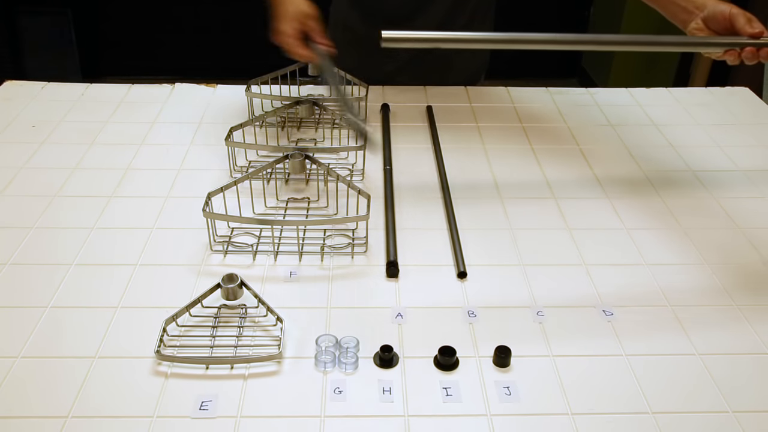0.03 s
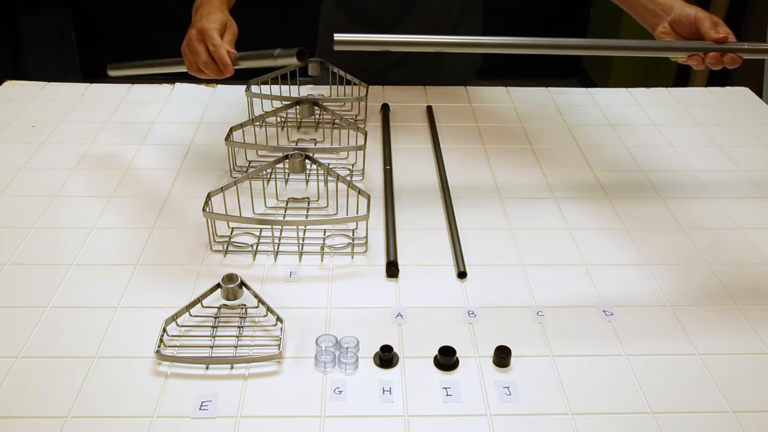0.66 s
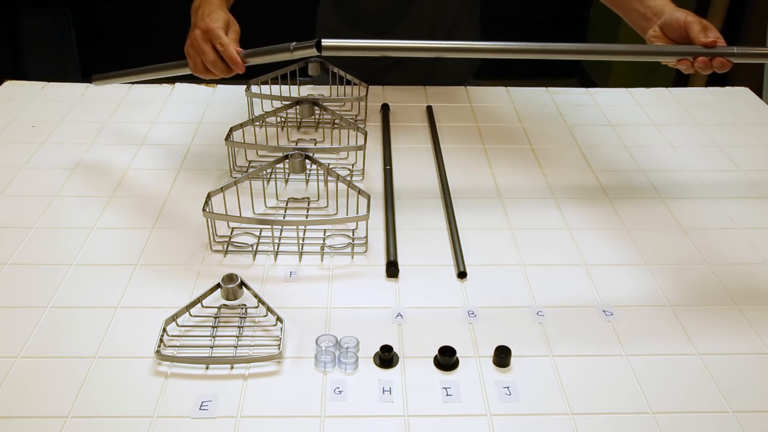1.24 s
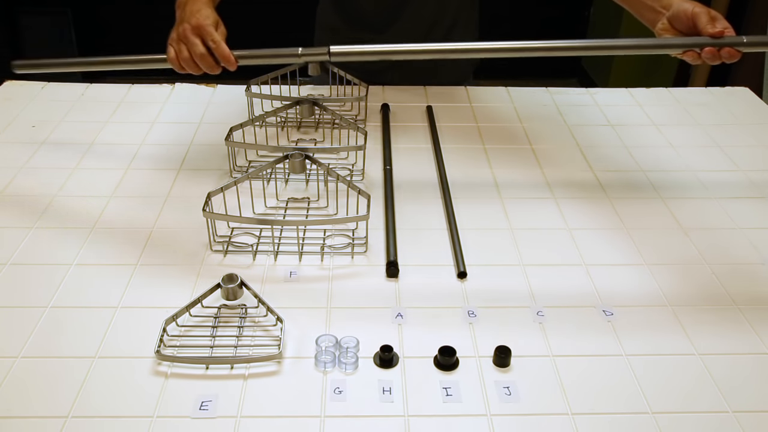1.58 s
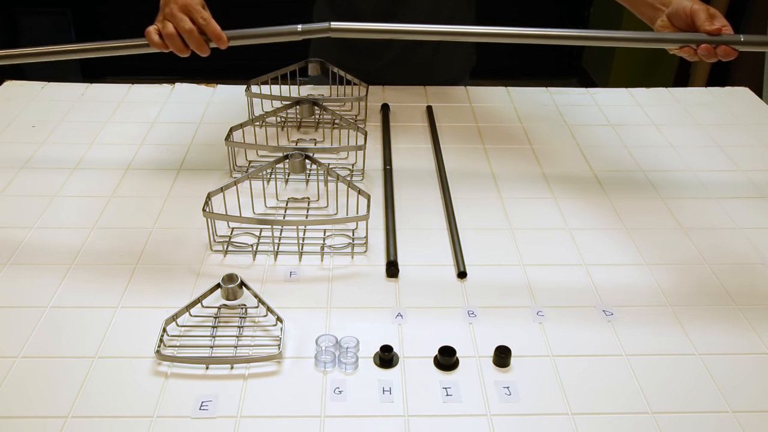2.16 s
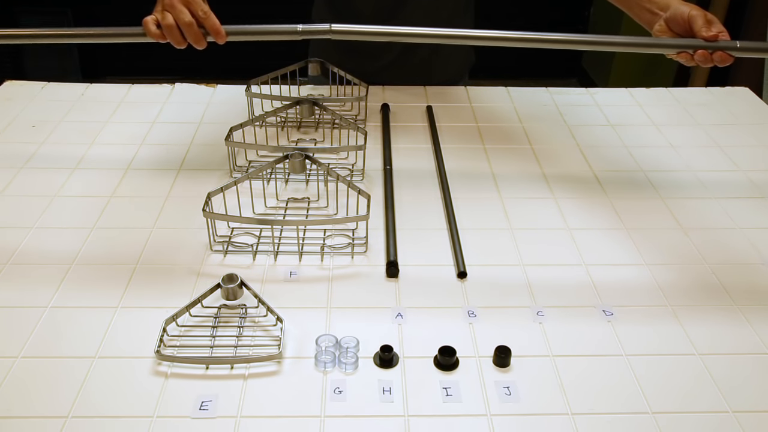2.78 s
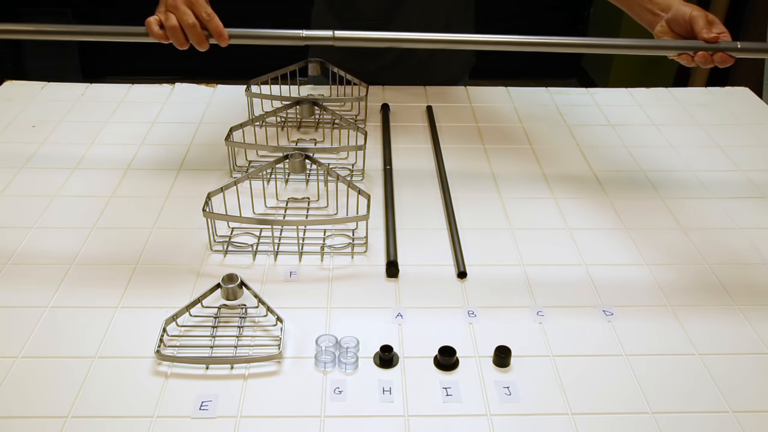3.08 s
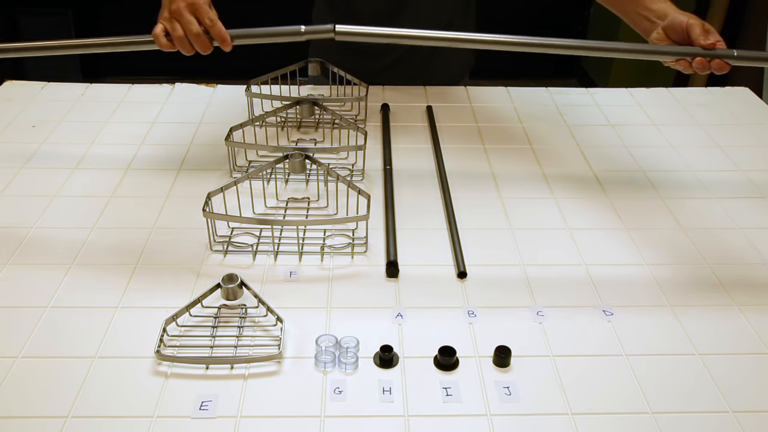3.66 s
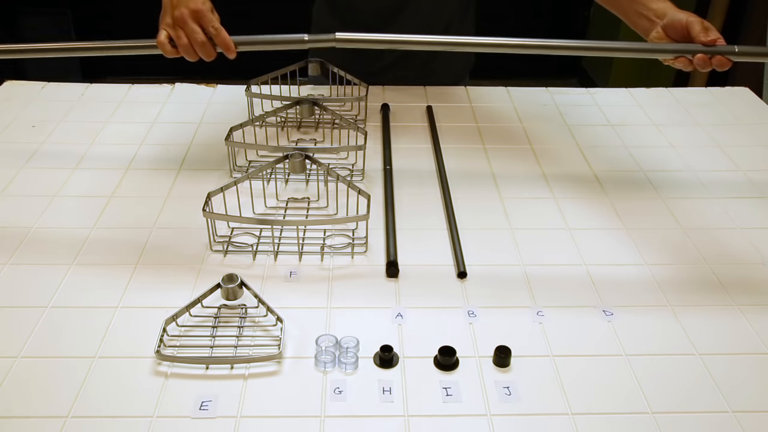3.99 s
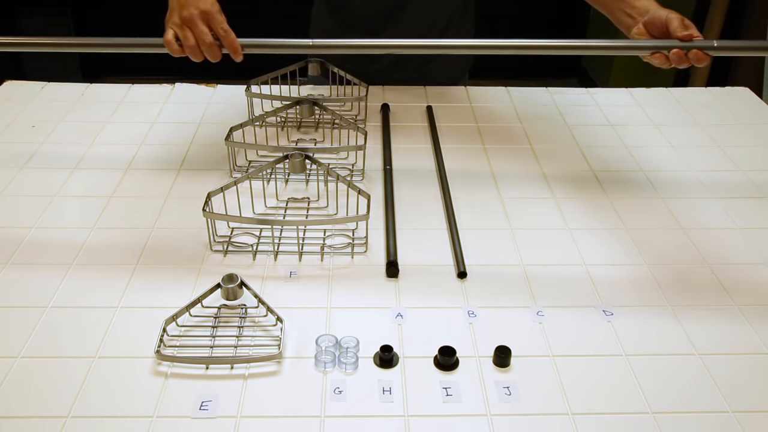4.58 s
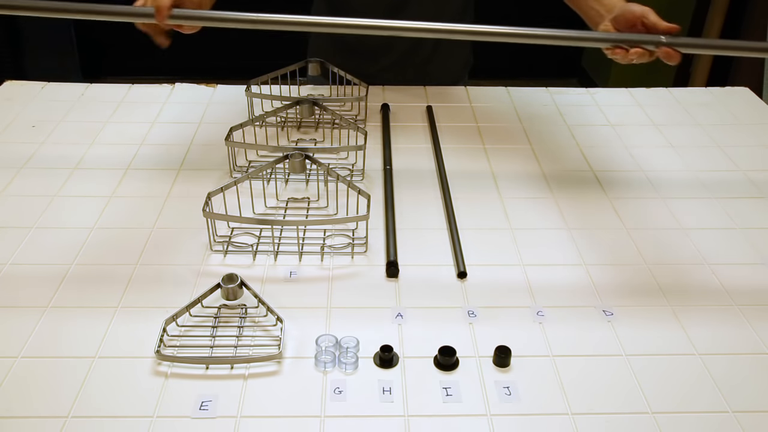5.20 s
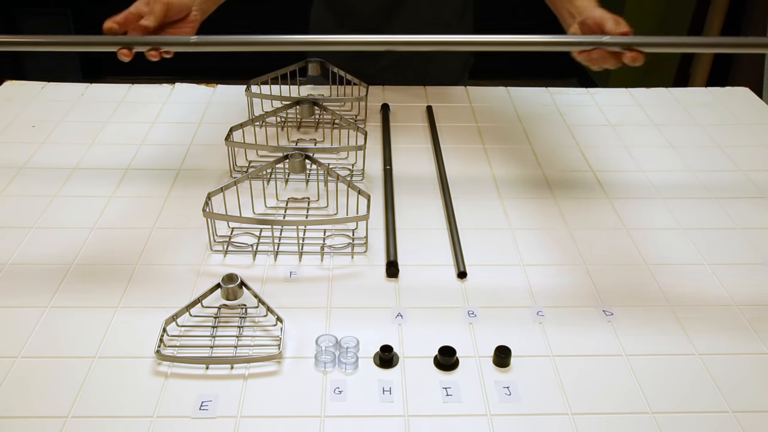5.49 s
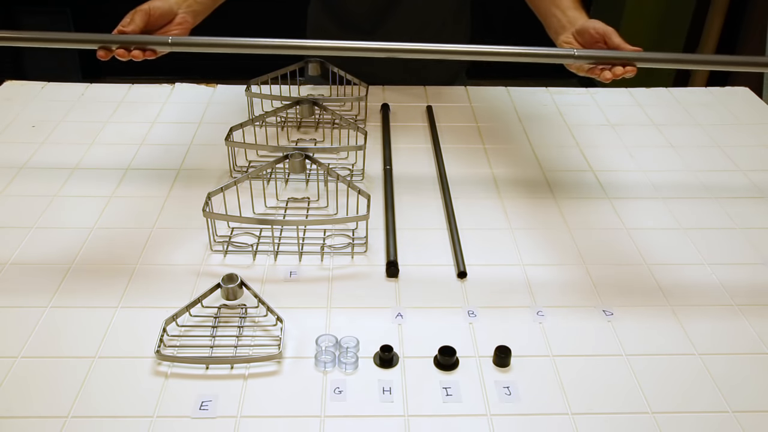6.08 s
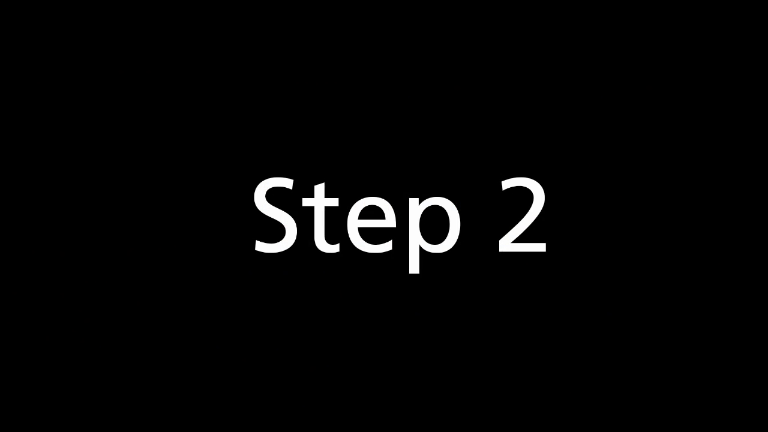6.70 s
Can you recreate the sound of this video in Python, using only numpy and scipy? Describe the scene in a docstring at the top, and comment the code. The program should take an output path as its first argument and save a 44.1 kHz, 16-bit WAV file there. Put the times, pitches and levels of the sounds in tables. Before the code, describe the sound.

Two hand-held metal tubes are fitted together close by in a small room with a low ventilation hum. After a soft rustle of skin on metal, the ends meet with two light clinks. Small clicks and a hard knock come next, followed by a short, squeaky scrape and a sharp metallic snap, the loudest sound. Hands then brush quietly along the joined pole with scattered ticks.

```python
"""A small room hums with ventilation while palms slide along a metal tube. After a second, two
hand-held tubes meet over a table: their ends knock, ring and graze each other. Light ticks lead to a
sharp knock, then one tube scrapes into the other, squeaks and snaps home at 4.4 s. A limiter briefly
turns everything down, hum included, after this loudest snap. Palms then slide along the joined pole,
with a few more ticks, until the sound stops at 6.6 s."""
import sys
import numpy as np
from scipy import signal
from scipy.fft import rfft, irfft
from scipy.io import wavfile
from scipy.ndimage import uniform_filter1d, minimum_filter1d

SR = 44100
rng = np.random.default_rng(int(sys.argv[2]) if len(sys.argv) > 2 else 0)


def inscribe(sig):
    """Save sig as 16-bit PCM at rate SR to the path in sys.argv[1].

    A 1-D sig is mono; a 2-D sig holds one channel per row.
    Samples are clipped to [-1, 1] before scaling.
    """
    pcm = np.round(np.clip(np.atleast_2d(sig).T, -1, 1) * 32767)
    wavfile.write(sys.argv[1], SR, pcm.astype(np.int16))


N = 302085
TIME = np.arange(N) / SR
RING_TIME = TIME[:SR * 3 // 4]  # the clock for one knock

# Tone of the ventilation's rumble and hiss: pitch_hz, gain_db
AIR_TONE = [(15, -36), (35, -4), (60, -10.5), (100, -6.5), (160, 0.5), (220, -11.5), (280, -5), (360, -9),
            (410, -16), (600, -22), (750, -26.5), (1500, -32.5), (4000, -35.5), (9000, -40), (15500, -47)]
# Low notes that the room boosts: pitch_hz, width_hz, boost_db
ROOM_BOOMS = [(86.3, 10, 9.5), (105.9, 2.8, 17.5), (121.2, 6.4, 10.5), (137, 11, -5.5), (204.3, 11, 8.5),
              (248.3, 30.7, 5)]
# Fan and motor notes: pitch_hz, level_db
MOTOR_NOTES = [(105.5, -61), (120, -71.5), (122.4, -40.5), (146.3, -45), (240, -53.5), (480, -71),
               (587, -61.5), (600, -62.5), (614, -65.5), (1394, -78.5)]
# Skin sliding on the tube: middle_s, length_s, level_db, airy_db (compared with level_db)
PALM_STROKES = [(0.172, .03, -54, -10), (0.204, 0.1, -52.5, 4), (0.264, 0.027, -62, -6),
                (0.385, 0.37, -60.5, -13), (4.887, 0.029, -54, -5), (5.22, .015, -52.5, -2),
                (5.253, 0.055, -52.5, -12), (5.36, 0.14, -58, -11), (5.57, 0.17, -57, 4),
                (5.732, 0.13, -57.5, 1)]
# Tone of the palms' hiss: pitch_hz, gain_db
PALM_TONE = [(500, -28), (1900, 1), (3200, 2), (5000, 1.5), (6100, 4), (9500, 6.5), (13000, -4.5),
             (16000, -8)]
# Tone of the airy top of that hiss: pitch_hz, gain_db
PALM_AIRY_TONE = [(3000, -24.5), (8000, -8.5), (11000, -1), (14000, -3.5), (16000, -4)]
# The grip shifting: middle_s, length_s, level_db
GRIP_SHIFTS = [(1.42, 0.11, -52.5), (4.89, 0.13, -52), (5.04, 0.27, -58.5)]
# Tone of the grip's dull rub: pitch_hz, gain_db
GRIP_TONE = [(400, 4), (1150, 1), (2300, -1), (4300, -11), (9000, -13)]
# Tube hitting tube: start_s, level_db, hardness (0 to 1), bass_hz, bass_db,
# ping_hz, ping_db (the touched rim's note), short_share (the short tube's part of the ring, 0 to 1)
TUBE_HITS = [(1.0713, -28.5, 0, 640, 16, 4440, 2, 1), (1.137, -26, 0.05, 840, 15.5, 3280, 4.5, 0.5),
             (1.243, -47, 0, 700, 8, 4500, -1, .4), (1.422, -43.5, 0.1, 800, -8, 3600, -1, 0.54),
             (2.936, -52, 0.5, 900, -7, 4400, -8, 0), (3.323, -49.5, 1, 900, -19, 5900, 16, 0),
             (3.4054, -39, 0.64, 1200, -9, 6000, 5, 0), (3.5071, -40.5, 1, 1200, 8, 4380, 14, 0),
             (3.719, -39, 0.32, 1200, 8, 1950, 11.5, 0.1), (3.7933, -12, 0.67, 970, 11, 5850, -1.5, 0.06),
             (4.2976, -43, 0.5, 1200, -7, 4100, 4, 0), (4.346, -22.5, 0.9, 1200, -25.5, 4070, 13, 0.2),
             (4.4106, -2.1, 0.87, 520, 0, 3830, 1.5, 0.13), (4.706, -47, 0.3, 900, -5, 2130, 4, 0.1),
             (4.781, -44, 0.73, 1200, 5, 7100, -0.5, 0), (4.803, -42, 0.8, 900, 15, 6950, 2, 0.2),
             (5.1162, -48, 0.9, 900, 16, 2960, 3, 0), (5.573, -50, 0, 900, -11, 1930, -3, 0.16),
             (5.661, -50, 0.36, 900, -10, 3200, 9, 0), (6.5442, -43.5, 1, 560, 34, 1277, -4, 0)]
# Tone of steel striking steel: pitch_hz, gain_db
CRACK_TONE = [(150, -36), (450, -2), (950, -9.5), (1300, -4), (1600, -9.5), (1900, -2), (2600, -5.5),
              (3200, 0), (5500, 1), (8400, 1), (10000, -8), (13000, -9), (16000, -13)]
# Notes of the long tube and the joined pole: pitch_hz, gain_db, ring_s (time to fade by 60 dB)
LONG_TUBE_NOTES = [(893, -8, .05), (1295, -16.5, .05), (1930, 1, 0.063), (2440, -3.5, .04),
                   (3080, 3.5, 0.05), (3600, -6.5, .05), (3750, -7.5, .025), (4436, 7, 0.032),
                   (5330, 4.5, 0.038), (6040, 5.5, .03), (6350, 2, .03), (6960, -1.5, .03),
                   (7720, -3.5, 0.051), (8330, -7, 0.045), (9800, -12, .035), (10150, -6.5, .04),
                   (11100, -7.5, .02), (11900, -12.5, .04), (12500, -11.5, .02), (13700, -10.5, .04)]
# Notes of the short tube: pitch_hz, gain_db, ring_s
SHORT_TUBE_NOTES = [(803, -14, .1), (1080, -11, .07), (1250, -3.5, 0.058), (1773, 1.5, 0.041),
                    (2180, -1, .09), (2390, -8, .1), (2850, 5, 0.046), (3600, -2, .07), (4480, -7, 0.035),
                    (5190, -5, .035), (7490, 3.5, .08)]
# Faint notes that the hands leave free to ring: pitch_hz, gain_db, ring_s
LINGERING_NOTES = [(1107, -26, .36), (1820, -22, .45), (1916, -22, 0.31), (2410, -31.5, 0.87),
                   (3015, -19, .45), (3095, -21.5, 0.5), (3620, -30.5, 0.63), (4640, -20.5, .4),
                   (6070, -30.5, .45), (6970, -26.5, .45), (7700, -28, .4), (8870, -34.5, .25),
                   (10500, -23.5, 0.28), (13170, -29, .22)]
# The open ends rubbing on each other: middle_s, length_s, level_db
RIM_GRAZES = [(1.27, 0.028, -48), (1.41, 0.078, -52), (1.55, 0.18, -57), (2.135, .04, -54)]
# Tone of that rubbing: pitch_hz, gain_db
RIM_TONE = [(500, 2.5), (1800, -1), (2600, -8), (3600, -1), (4500, -2), (5600, -7.68), (10000, -12)]
# Pushes of tube into tube: full_force_s, hold_s, level_db
TUBE_PUSHES = [(3.786, 0.0022, -40.5), (4.173, 0.0024, -33.5), (4.330, 0.023, -24), (4.379, 0.026, -27)]
# Tone of tube sliding inside tube: pitch_hz, gain_db
SCRAPE_TONE = [(400, -18.5), (680, -13), (1000, -3.5), (1420, -19), (2100, 0.5), (2450, -7), (2850, 2),
               (3300, -2), (4000, 8.5), (4500, -2), (5500, 0.5), (8300, 1.5), (9600, -7), (13000, -14.5),
               (16000, -21)]
# Sliding that catches on one note: middle_s, length_s, pitch_hz, level_db
SQUEAK_NOTES = [(4.32, .02, 2180, -33.5), (5.25, 0.043, 9500, -56), (5.73, .09, 9470, -59)]
# Bounces off the table top and nearest walls: delay_s, gain_db
NEAR_ECHOES = [(.0038, -11), (0.013, -17), (0.0236, -28.5), (.0292, -25.5)]
# Tone of what the walls give back: pitch_hz, gain_db
WALL_TONE = [(500, -2.5), (950, 5.5), (1500, 6.5), (2200, 7), (3300, 0.5), (9000, -1), (13000, 7),
             (16000, -2.5)]
# How long the room rings: pitch_hz, ring_s
ROOM_RING = [(200, .5), (1200, 0.39), (3500, 0.38), (8000, 0.45), (12000, 0.27), (16000, 0.16)]


def amp(db):
    """Turns decibels into a number to multiply by."""
    return 10 ** (np.asarray(db) / 20)


def unit(x):
    """Scales a signal to an average strength (rms) of 1."""
    return x / np.sqrt(np.mean(x ** 2) + 1e-20)


def read(points, hz):
    """Reads between a table's rows, with pitch spaced in octaves."""
    pitches, values = np.transpose(points)
    return np.interp(np.log(hz + 1), np.log(pitches + 1), values)


def add(mix, start_s, sound):
    """Mixes a sound in at start_s."""
    part = mix[round(start_s * SR):][:len(sound)]
    part += sound[:len(part)]


def colour(x, tone, size=2048):
    """Filters a sound to the given tone without smearing it earlier in time."""
    log_gain = np.log(amp(read(tone, abs(np.fft.fftfreq(size, 1 / SR)))))
    taps = np.fft.ifft(np.exp(np.conj(signal.hilbert(log_gain)))).real
    return signal.oaconvolve(x, taps[:size // 2])[:len(x)]


def drift(hz):
    """A smooth random wobble, with up to about hz changes a second."""
    keep_slow = np.exp(-(np.fft.rfftfreq(N, 1 / SR) / hz) ** 2)
    return unit(irfft(rfft(rng.standard_normal(N)) * keep_slow, N))


def ventilation(air_db=-37, wander_cycles=0.039):
    """Moving air rumbles and hisses, the room boosts some low notes, and motors hum, wavering a little."""
    hz = np.fft.rfftfreq(N, 1 / SR)
    boost = 1 + sum(amp(db) ** 2 / (1 + (2 * (hz - pitch) / width) ** 2) ** 2
                    for pitch, width, db in ROOM_BOOMS)
    air = unit(irfft(rfft(rng.standard_normal(N)) * amp(read(AIR_TONE, hz)) * np.sqrt(boost), N))
    hum = sum(amp(db) * np.sin(2 * np.pi * (pitch * TIME + wander_cycles * drift(9.8)))
              for pitch, db in MOTOR_NOTES)
    return amp(air_db) * air + np.sqrt(2) * hum


def slips(per_s, spread_db):
    """Sliding surfaces stick and slip, making tiny random clicks of uneven size."""
    clicks = (rng.random(N) < per_s / SR) * rng.choice([-1, 1], N)
    return clicks * amp(spread_db * np.minimum(rng.exponential(1, N), 4))


def stroking(strokes, shape=1.5):
    """Loudness swells and fades as a hand speeds up and slows: shape 1 is pointed, 2 is round."""
    return sum(amp(db) * np.exp(-np.minimum(abs(2 * (TIME - middle_s) / length_s) ** shape, 20))
               for middle_s, length_s, db in strokes)


def ringing(notes, detune, ring_share=1):
    """Struck metal rings; touch shifts each note a little and leaves ring_share of its ring time."""
    hz, db, ring_s = np.transpose(notes)[:, :, None]
    shift, sign = rng.uniform(-1, 1, (2, len(notes), 1))
    fade = np.exp(-np.log(1000) * RING_TIME / (ring_s * ring_share))
    waves = np.sin(2 * np.pi * hz * (1 + detune * shift) * RING_TIME)
    return (np.sign(sign) * amp(db) * fade * waves).sum(0)


def through_tube(rub, ring_db, ring_share=0.3, notes=LONG_TUBE_NOTES):
    """Rubbing is heard partly as it is and partly as the ringing it stirs in the tube."""
    ring = signal.oaconvolve(rub, ringing(notes, detune=0.002, ring_share=ring_share))[:N]
    return unit(unit(rub) + amp(ring_db) * unit(ring))


def hands(uneven_db=1.0):
    """Palms rustle along the polished tube in tiny catches; the shifting grip makes a lower rub."""
    slide = slips(per_s=2200, spread_db=3.5)
    rub = rng.standard_normal(N)
    pressure = amp(uneven_db * drift(70))
    hiss = unit(colour(through_tube(slide, ring_db=-4, ring_share=1), PALM_TONE))
    airy = unit(colour(slide, PALM_AIRY_TONE))
    dull = unit(colour(through_tube(rub, ring_db=-9), GRIP_TONE))
    palms = sum(stroking([(middle_s, length_s, db)]) * (hiss + amp(airy_db) * airy)
                for middle_s, length_s, db, airy_db in PALM_STROKES)
    return pressure * (palms + stroking(GRIP_SHIFTS) * dull)


def blend(soft, hard, hardness):
    """A value between its softest and its hardest setting."""
    return soft + (hard - soft) * hardness


def knock_tone(hardness, bass_hz, bass_db):
    """Harder hits are brighter; each hit has its own amount of bass."""
    corner_hz = blend(4500, 7000, hardness)
    treble_db = blend(-10.5, 4, hardness)
    top_db = treble_db + blend(-0.5, -1, hardness)
    return [(bass_hz * 0.43, bass_db - 23), (bass_hz, bass_db), (2000, 0),
            (corner_hz, 0), (corner_hz * 1.6, treble_db), (15000, top_db)]


def knocks(rise_s=0.0003, onset_samples=176):
    """Each hit chatters briefly and rings the tubes. Returns the direct sound and the room's share."""
    direct, to_room = np.zeros((2, N))
    t = RING_TIME
    attack = 1 - np.exp(-t / rise_s)
    for start_s, level_db, hardness, bass_hz, bass_db, ping_hz, ping_db, short_share in TUBE_HITS:
        # harder hits die away sooner
        contact_s = np.exp(blend(np.log(0.0083), np.log(0.0019), hardness))
        ping_s = np.exp(blend(np.log(0.0077), np.log(0.0029), hardness))
        ring_share = blend(1, 0.44, hardness)
        crack = colour(rng.choice([-1, 1], len(t)) * attack * np.exp(-t / contact_s), CRACK_TONE)
        crack /= crack[:onset_samples].std()
        ping = amp(ping_db) * np.exp(-t / ping_s) * np.sin(2 * np.pi * ping_hz * t)
        long_tube = (1 - short_share) * ringing(LONG_TUBE_NOTES, detune=0.0056, ring_share=ring_share)
        short_tube = short_share * ringing(SHORT_TUBE_NOTES, detune=0.004, ring_share=ring_share)
        tubes = amp(blend(-3, -5, hardness)) * (long_tube + short_tube)
        lingering = amp(-12) * ringing(LINGERING_NOTES, detune=0.00097)
        tone = knock_tone(hardness, bass_hz, bass_db)
        knock = colour(crack + attack * (ping + tubes + lingering), tone)
        knock *= amp(level_db) / knock[:onset_samples].std()
        add(direct, start_s, knock)
        # the room gathers sound from all sides of the tube, so its tone is smoother
        smooth_click = colour(colour(1.0 * (t == 0), CRACK_TONE), tone)
        all_sides = unit(unit(smooth_click) + amp(-4) * unit(knock))
        add(to_room, start_s, amp(-7.5) * knock.std() * all_sides)
    return direct, to_room


def rims():
    """The open ends graze each other and make the short tube ring."""
    catches = slips(per_s=900, spread_db=2.5)
    graze = through_tube(catches, ring_db=-1, ring_share=0.45, notes=SHORT_TUBE_NOTES)
    return stroking(RIM_GRAZES) * unit(colour(graze, RIM_TONE))


def scrape(grab_db_per_s=2496, let_go_db_per_s=1698):
    """One tube rasps into the other in dense catches; each push builds, holds and lets go."""
    rasp = through_tube(slips(per_s=3400, spread_db=1.5), ring_db=-9)
    force = np.zeros(N)
    for full_force_s, hold_s, level_db in TUBE_PUSHES:
        before_s = np.clip(full_force_s - TIME, 0, 1)
        after_s = np.clip(TIME - full_force_s - hold_s, 0, 1)
        force += amp(level_db - grab_db_per_s * before_s - let_go_db_per_s * after_s)
    return force * unit(colour(rasp, SCRAPE_TONE))


def squeaks(width_hz=87):
    """Brief, unsteady whistles where the sliding catches."""
    out = np.zeros(N)
    for middle_s, length_s, pitch_hz, level_db in SQUEAK_NOTES:
        phase = 2 * np.pi * pitch_hz * TIME
        whistle = (drift(width_hz) * np.sin(phase) + drift(width_hz) * np.cos(phase)) / np.sqrt(2)
        out += stroking([(middle_s, length_s, level_db)]) * whistle
    return out


def with_echoes(x):
    """The sound plus its first bounces off the table and walls."""
    out = x.copy()
    for delay_s, db in NEAR_ECHOES:
        add(out, delay_s, amp(db) * x)
    return out


def room(x, gap_s=0.018, build_s=0.0008):
    """After a short gap, many echoes blur into a tail whose highest notes die first."""
    hz, t, noise = signal.stft(rng.standard_normal(SR), SR, nperseg=256)
    fade = np.exp(-np.log(1000) * t / read(ROOM_RING, hz)[:, None])
    tail = signal.istft(noise * fade, SR, nperseg=256)[1][:SR]
    tail *= 1 - np.exp(-np.maximum(TIME[:SR] - gap_s, 0) / build_s)
    return amp(-6) * signal.oaconvolve(colour(x, WALL_TONE), tail / np.linalg.norm(tail))[:N]


def scene():
    """Tubes and hands in the room, over the ventilation, in one channel."""
    hits, hits_to_room = knocks()
    rubbing = scrape() + rims() + squeaks() + hands()
    room_tail = room(hits_to_room + amp(-7) * rubbing)
    return (with_echoes(hits + rubbing) + room_tail + ventilation())[None]


def record(dry, limit_db=-9, recover_db_per_s=150, hold_samples=5200, stop_s=6.636, cutoff_hz=15850):
    """A limiter turns loud moments down, holds and recovers; peaks clip and the top treble is cut."""
    level_db = 10 * np.log10(abs(uniform_filter1d(dry[0] ** 2, 176)) + 1e-12)  # averaged over 4 ms
    over_db = np.maximum(level_db - limit_db, 0)
    held_db = -minimum_filter1d(-over_db, hold_samples, origin=(hold_samples - 1) // 2)
    recovery_db = TIME * recover_db_per_s
    dip_db = np.maximum.accumulate(held_db + recovery_db) - recovery_db
    limited = np.clip(dry * amp(-dip_db), -1, 1)
    sudden_stop = np.clip((stop_s - TIME) / 0.00088, 0, 1)
    treble_cut = signal.firwin(511, cutoff_hz, window=("kaiser", 9), fs=SR)
    return signal.oaconvolve(limited * sudden_stop, treble_cut[None], "same")


dry = scene()
out = record(dry)
inscribe(out)
```